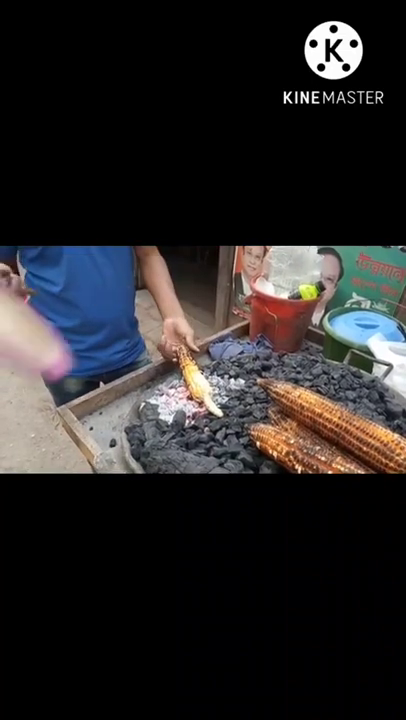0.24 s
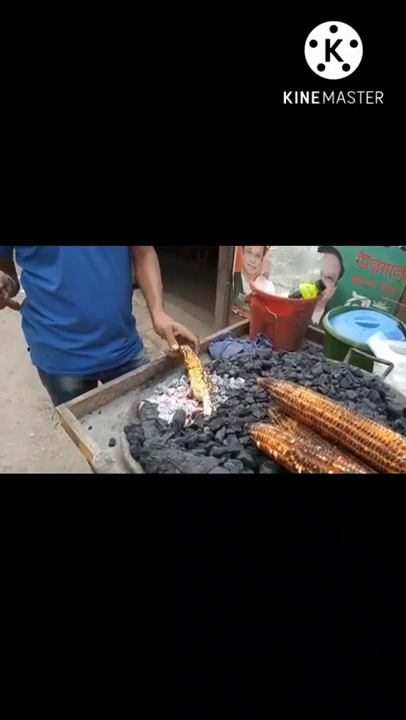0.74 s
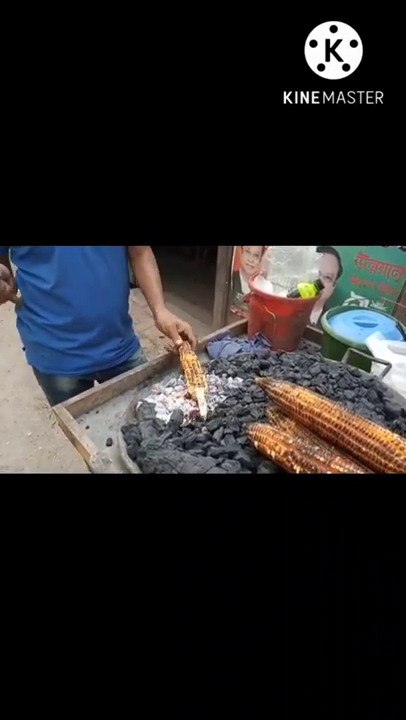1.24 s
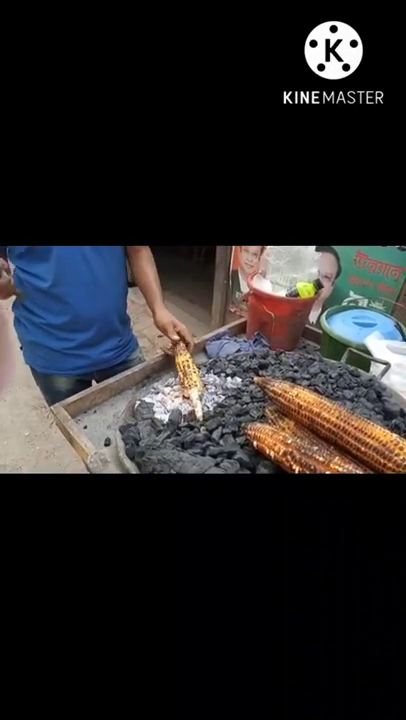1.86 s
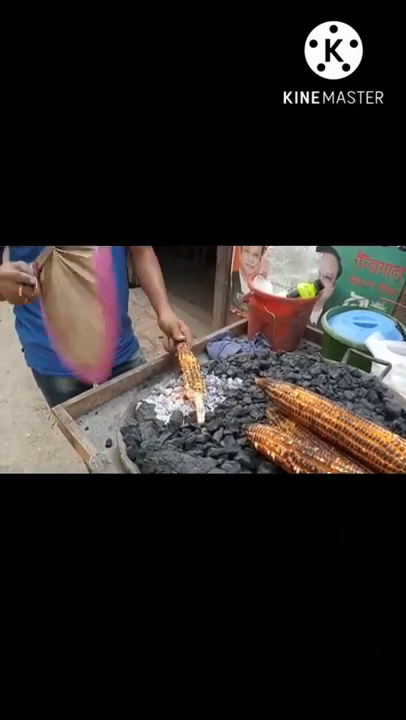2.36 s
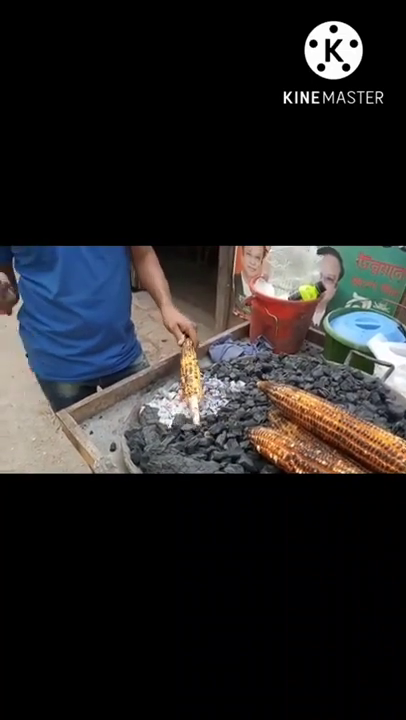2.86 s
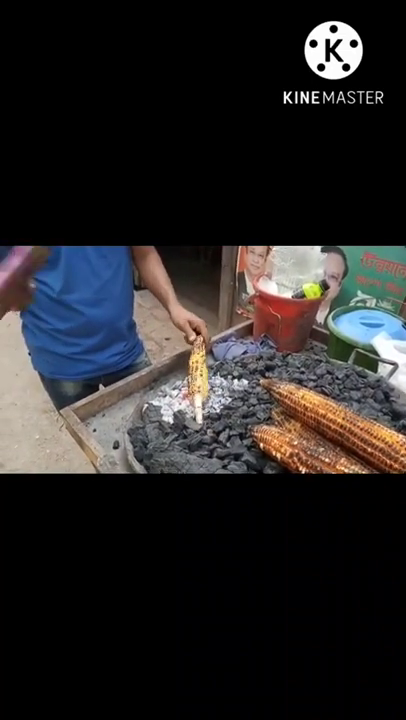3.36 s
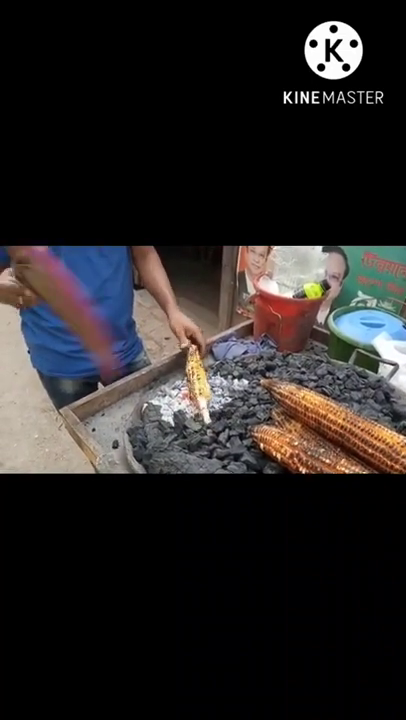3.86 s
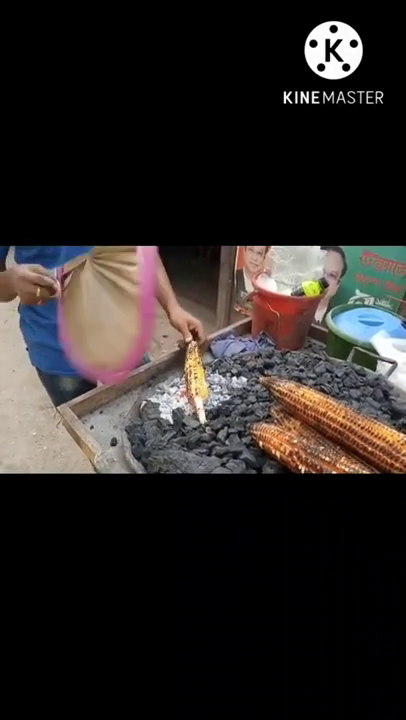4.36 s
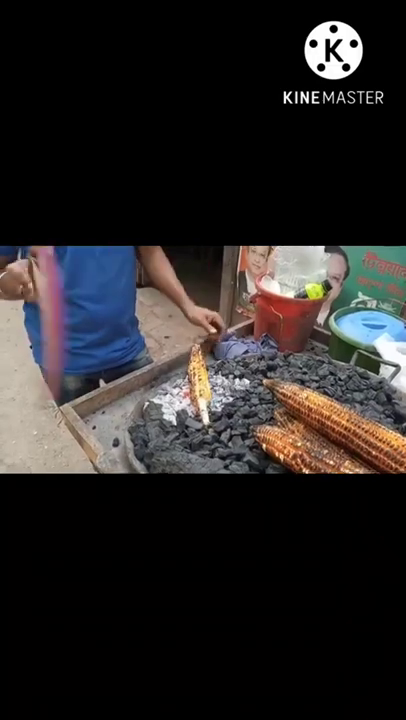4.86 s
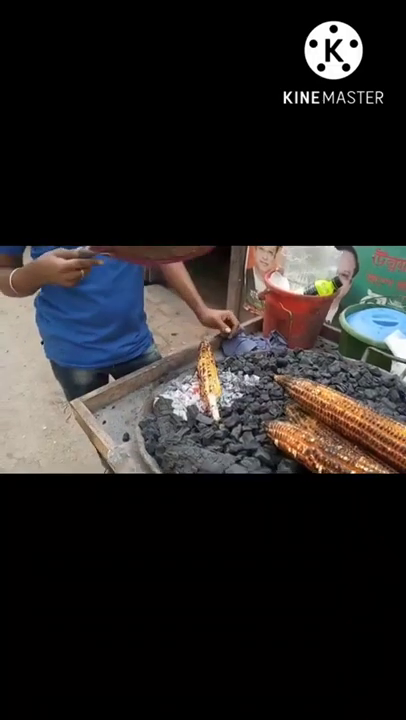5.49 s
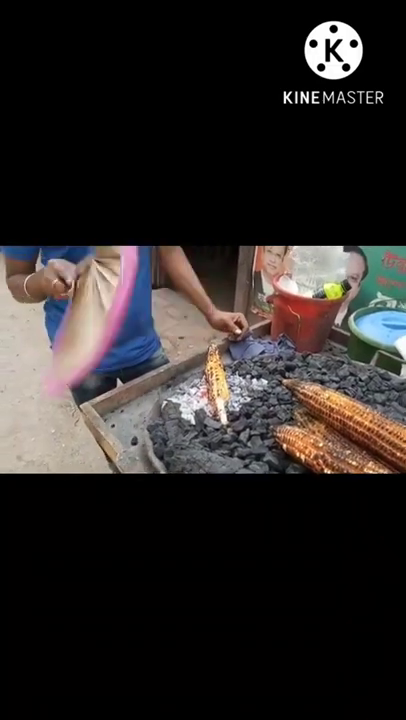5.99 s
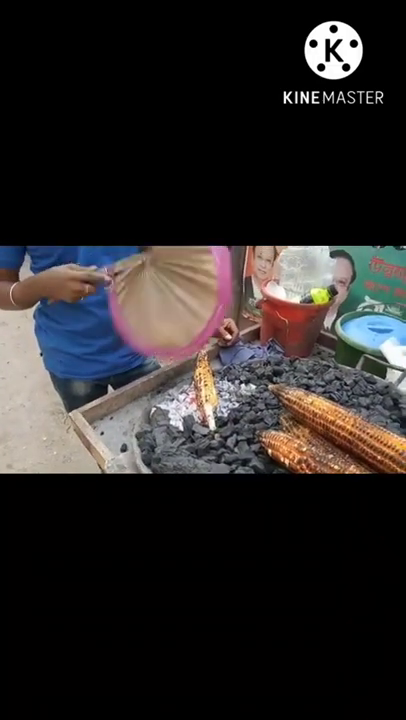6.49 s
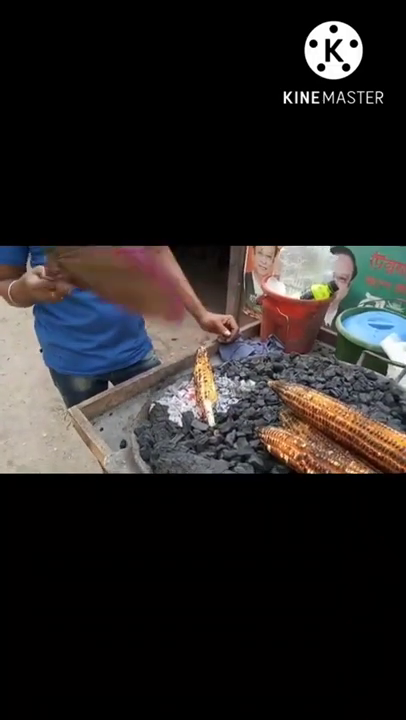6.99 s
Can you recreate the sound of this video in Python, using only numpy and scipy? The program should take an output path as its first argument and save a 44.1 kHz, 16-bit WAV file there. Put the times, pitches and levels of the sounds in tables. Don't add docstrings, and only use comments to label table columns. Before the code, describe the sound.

Roasting corn on live charcoal bursts in sharp, irregular cracks and brittle clinks with low thuds, over a soft ember hiss under a roof.

```python
import sys
import numpy as np
from scipy import signal
from scipy.io import wavfile
from scipy.ndimage import uniform_filter1d, map_coordinates

SR = 44100
rng = np.random.default_rng(int(sys.argv[2]) if len(sys.argv) > 2 else 0)


def int16_out(signal):
    q = np.round(np.clip(np.atleast_2d(signal).T, -1, 1) * 32767)
    wavfile.write(sys.argv[1], SR, q.astype(np.int16))


def gain_from_db(level_db):
    decades = np.asarray(level_db, float) / 20
    return 10 ** decades


N = 319284

# start_s, peak_db, thud_db, tray_ring_db, crumble_t60_s
KNOCKS = [(1.071, -29, -21.5, -0.5, 0.15), (1.222, -9.5, -29, -12, 0.056),
          (1.383, -16.5, -22, -11.5, 0.024), (2.079, -12, -29.5, -17.5, 0.09),
          (2.495, -24, -20, -3.5, 0.14), (2.955, -27, -39, -13.5, 0.015), (3.1762, -30, -25, -8, 0.066),
          (3.2716, -15.5, -38, -13.5, 0.061), (3.5025, -11.5, -25, -15.5, 0.017),
          (3.588, -17, -28.5, -18.5, 0.042), (4.355, -6.5, -26, -13, 0.076), (4.959, -7, -37, -19.5, 0.014),
          (5.2071, -13, -20, -11, 0.12), (5.526, -18.5, -33, -12, 0.12), (5.536, -17, -24, -27, 0.083),
          (6.4433, -10, -23, -12.5, 0.041), (6.89, -13, -26.5, -16.5, 0.03),
          (6.9025, -16, -35, -7.5, 0.077)]
# crunch_hz, then extra_db of the four strong tray modes
KNOCK_SPOTS = [(2300, -6, -2, 4, 5), (1900, -17, 2, -4, 7), (2100, 0.5, 0, 5.5, 4), (1390, 3.5, 2, 6.5, 1),
               (2100, 1.5, -21, -23, 2), (2200, 1, 2.5, -1, -8), (2060, 8.5, 0, -11, -8),
               (1900, -1.5, 4.5, 1, 3), (4200, 3, -10, 1.5, -1), (2100, 4, -8, 4.5, -8),
               (2100, -19, -19, 4, 1), (3450, -3, 3.5, 2, 1), (2100, -17, -10, 3.5, -11),
               (1900, 0, 0, 4, -11), (4300, 9, -4, -10, -8), (2100, 1.5, -7, -5, -7),
               (3800, 10.5, 12, 15, -10), (4000, -15, 4.5, 6.5, -28)]
# mode_hz, level_db, t60_s
TRAY_MODES = [(1021, -14, .11), (1280, -18, .08), (1630, -11, .18), (2010, -15, .08), (2053, -8, .21),
              (2085, -14, .1), (2595, -12, .1), (2822, -16, .12), (3250, -15, .07), (3640, -10.5, .18),
              (3685, -15, .1), (3960, -13, .07), (4290, -15, .12), (4570, -17, .09), (4750, -16, .09),
              (5300, -18, .07), (5510, -15, .09), (6230, -17, .1), (6900, -19, .08), (7720, -20, .08),
              (8440, -19, .08), (8950, -21, .08)]
STRONG_TRAY_HZ = (1021, 1630, 2053, 3640)
# mode_hz, level_db, t60_s
STAND_MODES = [(44.7, 18, 0.013), (104.6, -14, 0.62), (181.6, 5, 0.03), (208.8, -9, 0.087),
               (264, 7, 0.0024), (315, -6, 0.049)]
# start_s, peak_db, crunch_hz, broad_db, crumble_t60_s
BURSTS = [(0.1575, -16.5, 1740, 2, 0.033), (1.125, -8.5, 2900, -12.5, 0.018),
          (1.411, -18.5, 1840, -10.5, 0.075), (2.119, -7, 3380, -12.5, 0.012),
          (2.603, -22.5, 4730, -40, 0.023), (2.618, -22, 5500, -47, 0.027), (3.714, -51.5, 5800, 20, 0.082),
          (4.5851, -25, 1140, -25, 0.019), (4.6535, -14.5, 4960, -14.5, 0.017),
          (4.695, -20.5, 5500, -37, 0.014), (5.852, -17.5, 4000, -64, 0.012),
          (7.138, -20, 5640, -28, 0.029)]
# start_s, peak_db, crunch_hz, broad_db, crumble_t60_s
DEEP_BURSTS = [
    (.001, -40, 2390, 5.5, 0.013),
    (1.155, -22, 1830, -9, 0.045),
    (1.289, -21, 3360, -34, 0.023),
    (5.2395, -8, 1330, -16, 0.03),
    (5.269, -21.5, 930, -6, 0.0084),
    (6.643, -15.5, 1220, 1.5, 0.051),
]
# pitch_hz, density_db_per_hz
CRUNCH_COLOUR = [(180, -27), (300, -19.5), (600, -12), (850, -8.5), (1420, -8), (2000, 11.5), (2360, -3.5),
                 (3610, 8.5), (9040, 2), (11000, 5), (14300, -84.5), (22000, -120)]
# start_s, peak_db, crunch_hz, coal_ring_db
CLINKS = [(1.5, -11, 5630, -8.5), (2.141, -1.5, 5660, -29), (2.15, -8.5, 4230, -11.5),
          (2.175, -11.5, 4640, -10), (2.245, -8, 4800, -10), (4.588, -26.5, 4300, -6),
          (5.084, -28.5, 4100, -15), (5.297, -19.5, 4200, -16), (5.349, -21, 4160, -20),
          (5.536, -23, 4320, -24), (6.662, -5.5, 4500, -7.5), (6.706, -20, 4250, -12),
          (6.978, -17, 2640, -6), (7.006, -30.5, 4380, -2.5)]
CLINK_T60_S = [0.044, 0.026, 0.024, .04, 0.048, 0.055, .06, 0.036, 0.067, .07, 0.12, .07, 0.051, 0.048]
CLINK_PING_DB = [-13, -6, -6, -9, 1, -11, 4, 4, 7, 20, 3, 6, -5, -2]
# mode_hz, level_db, t60_s
COAL_MODES = [(1755, -9, .04), (2277, -13, .05), (2697, -8, .05), (3980, -7, .05), (4150, -3, .03),
              (4290, -2, .085), (4760, 0, .022), (5200, -14, .05), (5850, 0, .028), (6600, -5, .028),
              (7750, -3, .018), (8500, -13, .035), (9300, -8, .03), (9820, -12, .03)]
# start_s, level_db, pitch_hz, t60_s
SHARDS = [(2.084, -29.5, 2650, 0.1), (2.091, -33, 5600, 0.071), (2.122, -26, 4400, 0.049),
          (2.14, -27, 6630, .02), (2.153, -31, 2750, 0.056), (2.247, -14.5, 5900, 0.024),
          (2.261, -38, 8700, .08), (2.377, -22, 2260, 0.024), (3.177, -48, 6700, 0.055),
          (3.189, -52, 2900, 0.062), (3.272, -31.5, 3000, 0.044), (3.286, -33, 9300, 0.05),
          (3.286, -42, 6600, .03), (4.358, -33, 6300, .09), (4.6531, -26.5, 2460, 0.016),
          (4.587, -38, 2010, 0.047), (4.586, -37, 6650, .03), (1.073, -42.5, 1002, 0.15),
          (1.073, -41.5, 1635, .2), (1.08, -43, 4070, 0.18), (1.126, -25, 3490, 0.027),
          (1.225, -32, 1632, 0.15), (1.502, -20, 5910, 0.024), (1.509, -35, 8800, 0.071),
          (1.51, -41, 7650, .1), (2.247, -19.5, 8250, 0.018), (6.663, -14.5, 7700, 0.026),
          (6.663, -20, 9500, .03), (4.386, -43, 4050, .12), (5.2399, -20, 1045, 0.051),
          (5.266, -45, 4000, .08), (5.349, -42, 5900, 0.038), (6.889, -33, 3800, 0.019),
          (6.904, -21.5, 5500, 0.054), (6.902, -20, 9000, 0.026), (6.902, -29, 4000, 0.12),
          (6.95, -42, 5500, .1)]
# start_s, peak_db, pitch_hz, t60_s
SNAPS = [(1.336, -28.5, 2300, 0.05), (1.367, -28.5, 1950, 0.041), (1.469, -15.5, 1900, 0.0058),
         (1.623, -30, 3800, 0.031), (2.281, -22, 2050, 0.17), (2.353, -30, 2010, .024),
         (2.376, -19, 2280, 0.021), (2.471, -32, 4320, 0.016), (2.869, -41, 4950, 0.041),
         (2.907, -24.5, 2280, 0.097), (3.372, -39, 2700, 0.017), (3.385, -35.5, 2720, 0.035),
         (3.466, -38, 2300, 0.088), (3.627, -30.5, 1840, 0.093), (4.53, -37, 1230, 0.03),
         (4.725, -29.5, 4500, 0.048), (5.0633, -30, 1520, 0.048), (5.115, -35, 5030, 0.027),
         (5.126, -32.5, 2980, 0.022), (5.308, -26, 2100, 0.12), (5.392, -29, 1490, 0.0074),
         (5.416, -32, 4600, 0.028), (5.448, -31, 2100, 0.17), (5.658, -31.5, 1900, 0.18),
         (5.717, -28, 1940, 0.077), (5.747, -31.5, 1610, 0.022), (6.173, -35.5, 5800, 0.055),
         (6.5035, -29.5, 2060, .042), (6.571, -30, 5170, 0.027), (6.725, -23, 4300, 0.051)]
# start_s, peak_db, pitch_hz, fizz_db
SPITS = [(1.432, -36.5, 2160, 9), (1.513, -58, 1990, 18), (2.44, -54, 2260, -12), (2.56, -50, 1680, 16),
         (2.652, -43, 980, 2), (3.088, -37.5, 1000, 3), (3.836, -34.5, 1670, -11), (4.233, -39, 2090, -4),
         (4.428, -43, 2080, 7), (4.774, -34, 4600, -5), (4.989, -28, 4960, -10), (5.28, -36, 1020, 6),
         (5.431, -24.5, 1860, -22), (5.582, -47.5, 4300, 13), (6.054, -35.5, 1920, -3.5),
         (6.276, -41, 4700, -7), (6.368, -31, 2020, -18), (6.56, -33, 2570, -7), (6.816, -28, 1920, -1),
         (6.82, -23.5, 1570, -8.5), (6.882, -28, 1920, 3), (6.921, -28, 2120, 5), (7.068, -27, 1880, -8),
         (7.096, -33, 1460, -7), (7.169, -27.5, 2300, -2.5), (2.085, -20, 2570, -21),
         (2.108, -23, 3600, -1.5), (2.214, -39, 1700, -8), (3.287, -27, 2100, -1), (5.399, -38, 2600, -6),
         (5.359, -44, 4300, -17), (3.409, -47, 1670, -13), (3.441, -43, 2300, -14), (3.539, -35.5, 935, 4),
         (5.28, -41, 6100, -16), (5.353, -26, 1800, -11), (5.385, -35, 3500, -19), (5.408, -33, 2300, -14),
         (5.605, -39, 1900, -17), (5.612, -37.5, 810, -19), (5.627, -37, 1700, -13), (6.435, -36, 4000, -5),
         (6.565, -34, 2610, -1), (6.598, -38.5, 1990, -10), (6.692, -26, 4300, -7), (6.727, -28, 1960, -5),
         (6.899, -26.5, 2610, 12), (6.913, -23, 4570, 3), (7.012, -41, 2300, 14), (7.018, -53, 2530, -4)]
# start_s, ring_db, struck_hz
JARS = [
    (.001, -49.5, 2100),
    (.158, -45, 1434),
]
# mode_hz, level_db, t60_s
PAN_MODES = [(1054, 0, .2), (1270, -5, .4), (1555, -7, .25), (1800, -3, .3), (1918, -4, .35),
             (2350, -3, .22), (2545, 0, .22), (3530, -1, .3), (4360, -4, .3), (4740, 2, .3), (5990, 4, .12)]
# start_s, hiss_db
GLOW = [(0, -53.5), (.14, -62.5), (.56, -73.5), (.76, -71), (1.04, -55), (1.6, -57), (2.0, -56.5),
        (2.6, -60.5), (3.0, -58.5), (3.45, -53.5), (4.05, -60), (4.3, -57), (4.9, -59), (5.5, -56.5),
        (5.8, -56), (6.1, -59), (6.4, -57), (7.24, -56)]
# pitch_hz, density_db_per_hz
HISS_COLOUR = [(470, -48), (800, -37), (996, -8.5), (1200, -4.5), (2030, 4.5), (3050, -1.5), (4890, 0.5),
               (6430, -7.5), (7170, -9), (9330, -7.5), (11000, -22), (14300, -59), (22000, -120)]
# start_s, rumble_db
WIND = [(0, -36.5), (.32, -72), (.58, -53), (0.759, -58.5), (1.041, -49), (1.12, -51), (1.3, -48),
        (1.58, -52.5), (1.9, -55), (2.05, -54), (2.25, -60), (2.45, -63), (2.78, -46), (3.241, -58.5),
        (3.5, -61), (3.68, -49.5), (4.05, -42.5), (4.2, -55.5), (4.499, -66), (5.1, -58), (6.8, -65),
        (7.24, -55)]
# pitch_hz, density_db_per_hz
RUMBLE_COLOUR = [(18, -18), (30, 0), (45, 3), (60, -5), (78, -14), (102, -11), (125, -22), (160, -24)]
# pitch_hz, density_db_per_hz
HUM_COLOUR = [(110, -30), (150, -8), (200, 3.5), (250, -10), (320, 1.5), (450, -17), (700, -10.5),
              (1000, -24)]
# pitch_hz, likeness (1 is mono)
LIKENESS = [(60, 0.43), (170, 0.6), (480, 0.2), (1350, 0.83), (3800, 0.71), (10700, 0.28)]
# pitch_hz, t60_s
STALL_T60 = [(100, 0.97), (400, 0.36), (1100, 0.42), (3000, 0.3), (8000, 0.22)]
# pitch_hz, level_db
STALL_DB = [(100, -13), (500, 2.5), (1500, -8), (4000, -8.5), (9000, -7.5)]

WOBBLE_DB = 1.8


def tray_knocks():
    s, peak_db, _, ring_db, _ = np.transpose(KNOCKS)
    spot_db = np.transpose(KNOCK_SPOTS)[1:]
    return struck(s, peak_db + ring_db, 2060, TRAY_MODES, near_db=-2.5, spread_db=2.0, contact_s=0.004,
                  wobble_db=WOBBLE_DB, strong=STRONG_TRAY_HZ, spot_db=spot_db)


def lump_cracks():
    rows = [(s, db, hz, t60) for (s, db, *_, t60), (hz, *_) in zip(KNOCKS, KNOCK_SPOTS)]
    return crunch(rows, broad_db=-13.0, focus_db=-8.5, cycles=2.35, rise_s=0.00142)


def thuds():
    rows = [(s, peak_db + thud_db) for s, peak_db, thud_db, *_ in KNOCKS]
    for s, peak_db, hz, broad_db, _ in BURSTS + DEEP_BURSTS:
        loss_db = 6 * max(np.log2(hz / 1500), 0)
        rows.append((s, peak_db + broad_db - 21.5 - loss_db))
    s, level_db = np.transpose(rows)
    clicks = np.zeros(N)
    clicks[np.round(s * SR).astype(int)] = gain_from_db(level_db + 7.5)
    push = -np.hanning(70) / 35
    clicks = np.convolve(clicks, push)[20:N + 20]
    body = sum(gain_from_db(mode_db) * ring(clicks, hz, t60) for hz, mode_db, t60 in STAND_MODES)
    return body + gain_from_db(19.5) * clicks


def kernel_bursts():
    rows = BURSTS + DEEP_BURSTS
    return crunch(rows, broad_db=np.array(rows)[:, 3] - 8.0, focus_db=-6.0, cycles=3.0, rise_s=.0004)


def coal_clinks():
    s, peak_db, hz, ring_db = np.transpose(CLINKS)
    return struck(s, peak_db + ring_db, hz, COAL_MODES, near_db=2.0, spread_db=-2.5, contact_s=0.0012,
                  wobble_db=WOBBLE_DB, strong=(4290,), spot_db=[np.array(CLINK_PING_DB)])


def coal_cracks():
    rows = [row + (t60,) for row, t60 in zip(CLINKS, CLINK_T60_S)]
    return crunch(rows, broad_db=-32.0, focus_db=-10.5, cycles=1.3, rise_s=0.000071)


def sparks():
    out, taps = np.zeros((2, N))
    snap_fizz_db, spit_t60_s, tap_db, tap_hz = -18.5, 0.027, -30, 221.6
    rows = [row + (snap_fizz_db,) for row in SNAPS]
    rows += [(s, db, hz, spit_t60_s, fizz_db) for s, db, hz, fizz_db in SPITS]
    for s, peak_db, hz, t60, fizz_db in rows:
        noise = rng.standard_normal((2, 6000))
        tone = peak(noise[0] * fade(0.27 * t60, 1e-4), hz, 5.6, 0.84)
        high_hz = min(2.24 * hz, 8000)
        fizz = ring(noise[1] * fade(t60, 0.000067), high_hz, 1.2 / high_hz)
        fizz = ring(fizz, high_hz, 1.5 / high_hz)
        add(out, s, gain_from_db(peak_db) * (tone + gain_from_db(fizz_db) * fizz / np.abs(fizz).max()))
        add(taps, s, gain_from_db([peak_db + max(fizz_db, 0) + tap_db]))
    out = signal.sosfilt(signal.butter(2, 800, "high", fs=SR, output="sos"), out)
    return out + signal.lfilter([.06], [1, -.94], ring(taps, tap_hz, 0.25))


def pan_jars():
    strong_hz = (1054, 1270, 1800, 2545, 3530)
    spot_db = np.array([[4, -10], [-9, 3], [7, -4], [1, 3], [2, -1]])
    return struck(*np.transpose(JARS), PAN_MODES, near_db=9.0, spread_db=2.5, contact_s=0.0033,
                  wobble_db=4.0, strong=strong_hz, spot_db=spot_db)


def stirring():
    rise_s, settle_s = 0.034, 0.062
    events = KNOCKS + CLINKS + BURSTS + DEEP_BURSTS + SNAPS
    s, peak_db = np.transpose([row[:2] for row in events])
    pushes = np.zeros(N)
    pushes[np.round(s * SR).astype(int)] = gain_from_db(20.5 + 0.98 * peak_db) ** 2
    t = np.arange(SR) / SR
    flare = (1 - np.exp(-t / rise_s)) * np.exp(-t / settle_s)
    swell = signal.fftconvolve(pushes, flare)[:N]
    return 10 * np.log10(1 + np.maximum(swell, 0))


def ember_ticks(hiss_db, swell_db):
    ticks_per_s = 150
    sizes = gain_from_db(2.6 * np.minimum(rng.exponential(1, N), 3.2)) * rng.choice([-1, 1], N)
    born = rng.random(N) < ticks_per_s * gain_from_db(swell_db) / SR
    dealt = rng.integers(0, 12, N)
    ticks = 0
    for k, hz in enumerate(np.geomspace(1000, 7000, num=12)):
        ticks = ticks + ring(sizes * born * (dealt == k), hz, 22.0 / hz)
    return gain_from_db(hiss_db - 4.5) * ticks


def ember_hiss(hiss_db):
    return gain_from_db(hiss_db) * banded_noise(HISS_COLOUR, 628, 12500, patchy_db=1.5, rate=12.0)


def street_hum(glow_db, swell_db):
    hum_db = -69 + 0.18 * swell_db + 0.19 * np.minimum(glow_db + 62.5, 0)
    return gain_from_db(hum_db) * banded_noise(HUM_COLOUR, 102.7, 1100, patchy_db=1.0, rate=7.7)


def fan_wind():
    return gain_from_db(follow(WIND)) * banded_noise(RUMBLE_COLOUR, 23, 170, patchy_db=2.5, rate=9.6)


def lorry():
    lines = sum(rms_one(ring(rng.standard_normal(N), hz, 0.69)) for hz in (45, 70))
    passing = np.interp(np.arange(N) / SR, (3.7, 3.78, 4.12, 4.24), [0, 1, 1, 0])
    return gain_from_db(-66) * passing * lines


def stall(x):
    t = np.arange(int(.7 * SR)) / SR
    white, tail = rng.standard_normal((2, 2, len(t))), 0
    for k, (hz, sos) in enumerate(bands(63.6, 12500)):
        mid, side = signal.sosfilt(sos, white[k % 2])
        t60 = at_hz(STALL_T60, hz)
        fall = gain_from_db(at_hz(STALL_DB, hz) - 60 * t / t60) * np.sqrt(2 * np.log(1000) / t60 / SR)
        tail = tail + fall * (mid + .7 * side * [[1], [-1]])
    tail = tail * np.clip((t - .002) / 0.0013, 0, 1)
    return signal.fftconvolve(x[None], tail, axes=1)[:, :N]


def placed(x, left_db, lag_s):
    late = map_coordinates(x[0], [np.arange(N) - lag_s * SR], order=3)
    return np.array([gain_from_db(left_db / 2) * late, gain_from_db(-left_db / 2) * x[1]])


def struck(s, ring_db, crunch_hz, modes, near_db, spread_db, contact_s, wobble_db, strong=(), spot_db=()):
    damping, detune = .8, .01
    out, chance = 0, rng.uniform(-1, 1, (len(s), len(modes), 3))
    for (hz, level_db, t60), (own, late, off) in zip(modes, chance.transpose(1, 2, 0)):
        own_db = spread_db * own
        for strong_hz, extra_db in zip(strong, spot_db):
            if abs(hz / strong_hz - 1) < .01:
                own_db, off = extra_db, off / 4
        db = ring_db + level_db + own_db - near_db * np.abs(np.log2(hz / crunch_hz))
        start_s = s + contact_s * np.abs(late)
        out = out + ringing(start_s, db, hz * (1 + detune * off), damping * t60, wobble_db)
    return out


def ringing(s, level_db, hz, t60, wobble_db, size=12000):
    out, t = np.zeros(N), np.arange(size) / SR
    slow = rng.standard_normal((len(s), size // 40 + 1))
    slow = uniform_filter1d(slow, size=5, axis=1) * np.sqrt(5)
    for at, db, f, decay, waver in zip(*np.broadcast_arrays(s, level_db, hz, t60), slow):
        n = int(min(size, 1.2 * abs(decay) * SR + 40))
        waver_db = wobble_db * np.interp(np.arange(n) / 40, np.arange(len(waver)), waver)
        level = gain_from_db(db + waver_db - 60 * t[:n] / abs(decay))
        add(out, at, level * np.sin(2 * np.pi * f * t[:n]))
    return out


def crunch(table, broad_db, focus_db, cycles, rise_s):
    broad, tuned = np.zeros(N), np.zeros(N)
    t = np.arange(6000) / SR
    crumbling = 1 - np.exp(-t / .004)
    crack = 1 + 0.37 * np.exp(-t / 0.0005)
    for (s, peak_db, hz, *_, t60), share_db in zip(table, broad_db + np.zeros(len(table))):
        noise, grain = rng.standard_normal((2, 6000))
        grain_db = 3.2 * crumbling * rms_one(uniform_filter1d(grain, size=60))
        burst = noise * crack * fade(t60, rise_s) * gain_from_db(grain_db)
        focus = peak(burst, hz, cycles, cycles)
        add(broad, s - rise_s, gain_from_db(peak_db + share_db) * burst)
        add(broad, s, gain_from_db(peak_db + share_db + 12.0) * np.hanning(5))
        add(tuned, s - rise_s, gain_from_db(peak_db + focus_db) * focus)
    grid = np.linspace(0, SR / 2, 200)
    colour = signal.minimum_phase(signal.firwin2(255, grid, gain_from_db(2 * at_hz(CRUNCH_COLOUR, grid)), fs=SR))
    coloured = signal.lfilter(colour / np.linalg.norm(colour), 1, broad)
    return coloured + signal.sosfilt(signal.butter(2, 700, "high", fs=SR, output="sos"), tuned)


def peak(push, hz, first, second):
    out = ring(ring(np.diff(push, prepend=0), hz, first / hz), hz, second / hz)
    return out / np.abs(out).max()


def ring(push, hz, t60):
    r, w = gain_from_db(-60 / (max(t60, 1e-3) * SR)), 2 * np.pi * hz / SR
    return signal.lfilter([0, np.sin(w)], [1, -2 * r * np.cos(w), r * r], push + 1e-18)


def fade(t60, rise_s, size=6000):
    t = np.arange(size) / SR
    return (1 - np.exp(-t / rise_s)) * gain_from_db(-60 * t / np.clip(t60, .003, .3))


def banded_noise(spectrum, low_hz, high_hz, patchy_db, rate):
    out, together, white = 0, drift(rate / 3), rng.standard_normal((2, 2, N))
    for k, (hz, sos) in enumerate(bands(low_hz, high_hz)):
        mid, side = signal.sosfilt(sos, white[k % 2])
        alike = np.clip(at_hz(LIKENESS, hz), -.9, 1)
        gain = gain_from_db(at_hz(spectrum, hz) + patchy_db * (1.87 * together + drift(rate)))
        out = out + gain * (np.sqrt(1 + alike) * mid + np.sqrt(1 - alike) * side * [[1], [-1]])
    return rms_one(out)


def bands(low_hz, high_hz):
    edges = low_hz * 2 ** np.arange(0, np.log2(high_hz / low_hz) + .01, 1 / 3)
    return [(np.sqrt(a * b), signal.butter(2, [a, b], "band", fs=SR, output="sos"))
            for a, b in zip(edges, edges[1:])]


def drift(rate):
    r = np.exp(-80 * np.pi * rate / SR)
    slow = signal.lfilter([1], [1, -2 * r, r * r], rng.standard_normal(N // 40 + 2002))[2000:]
    return np.interp(np.arange(N) / 40, np.arange(len(slow)), rms_one(slow))


def follow(curve):
    return np.interp(np.arange(N) / SR, *np.transpose(curve))


def at_hz(points, hz):
    points_hz, values = np.transpose(points)
    return np.interp(np.log(hz + 1e-9), np.log(points_hz), values)


def rms_one(x):
    return x / np.sqrt(np.mean(x ** 2) + 1e-20)


def add(out, s, piece):
    at = round(s * SR)
    out[at:at + len(piece)] += piece[:N - at]


def scene():
    glow_db, swell_db = follow(GLOW), stirring()
    hiss_db = glow_db + swell_db
    cracks = lump_cracks() + kernel_bursts() + thuds() + sparks() + ember_ticks(hiss_db, swell_db)
    rings = tray_knocks() + pan_jars() + ringing(*np.transpose(SHARDS), WOBBLE_DB)
    brittle, clinks = coal_cracks(), coal_clinks()
    echoes = stall(cracks + brittle + gain_from_db(-6) * (rings + clinks))
    heap = placed(cracks + rings + echoes, left_db=1.93, lag_s=2.7e-5)
    bright = placed([brittle + clinks] * 2, left_db=0, lag_s=4.5e-5)
    background = ember_hiss(hiss_db) + street_hum(glow_db, swell_db) + fan_wind() + lorry()
    return heap + bright + background


def treble_holes(x):
    recall_db_per_s, lowest_hz, share, hole_db = 90, 5600, .035, -18
    hz, _, z = signal.stft(x, SR, nperseg=1024)
    level_db = 10 * np.log10(np.mean(np.abs(z[:, hz > 1000]) ** 2, axis=(0, 1)) + 1e-14)
    sink_db = recall_db_per_s * np.arange(len(level_db)) * 512 / SR
    recalled_db = np.maximum.accumulate(level_db + sink_db) - sink_db
    wake = np.clip((recalled_db - level_db) / 6, 0, 1)
    steady = np.diff(level_db, append=0) < 3
    chance = rng.random((len(hz) // 8 + 1, len(level_db) // 3 + 1)).repeat(8, 0).repeat(3, 1)
    chance = chance[:len(hz), :len(level_db)]
    dropped = (chance < share * (1 + 4 * wake) * steady) & (hz > lowest_hz)[:, None]
    lost = signal.istft(z * dropped * (1 - gain_from_db(hole_db)), SR, nperseg=1024)[1]
    return x - lost[:, :N]


def low_pass(x):
    return signal.sosfilt(signal.butter(12, 12300, fs=SR, output="sos"), x)


def record(dry):
    t = np.arange(N) / SR
    drop_s, back_s, edge_s = .752, 1.042, 0.00063
    live = np.clip(np.maximum(drop_s - t, t - back_s) / edge_s, 0, 1)
    top_cut = signal.cheby2(12, 40, 11250, fs=SR, output="sos")
    mix = treble_holes(signal.sosfilt(top_cut, dry * live))
    return low_pass(mix)


dry = scene()
out = record(dry)
int16_out(out)
```